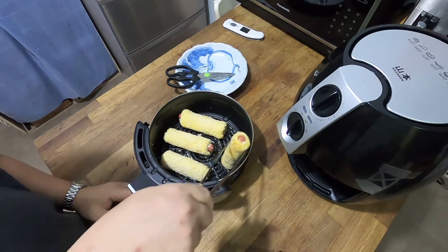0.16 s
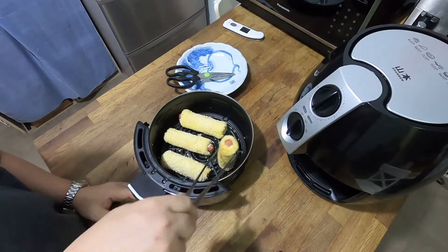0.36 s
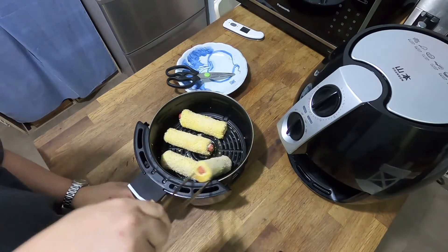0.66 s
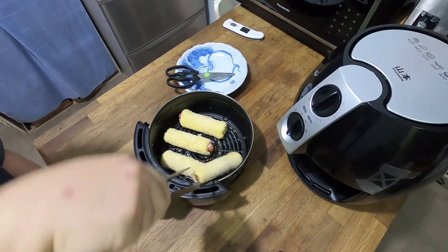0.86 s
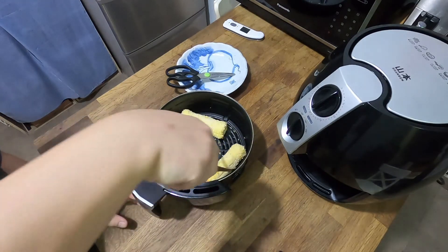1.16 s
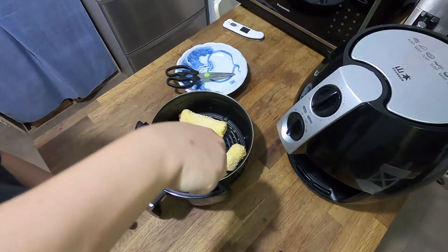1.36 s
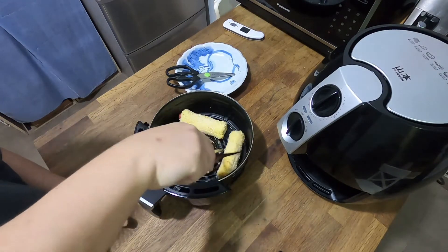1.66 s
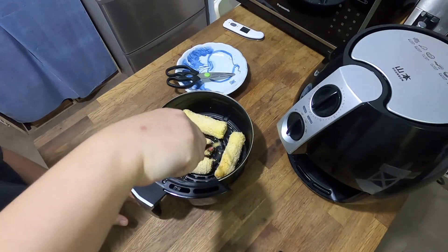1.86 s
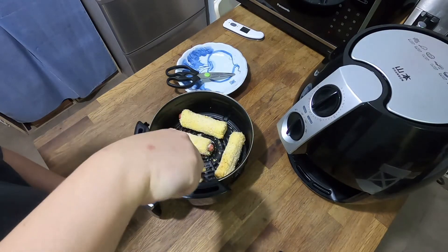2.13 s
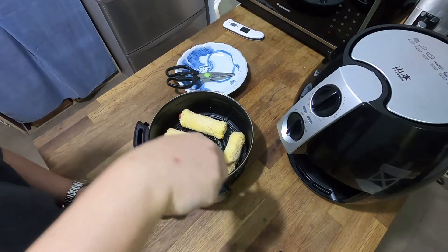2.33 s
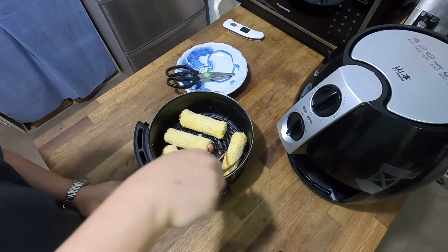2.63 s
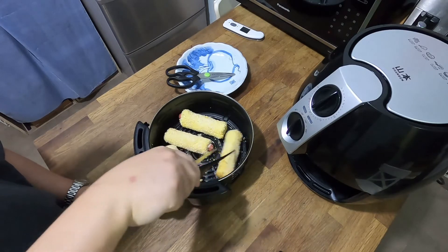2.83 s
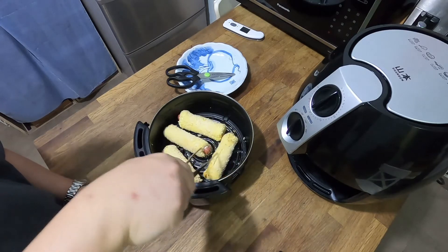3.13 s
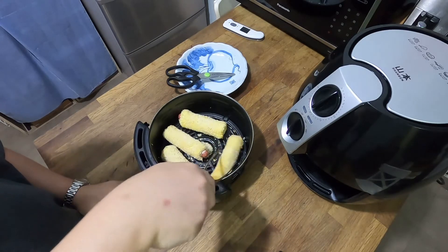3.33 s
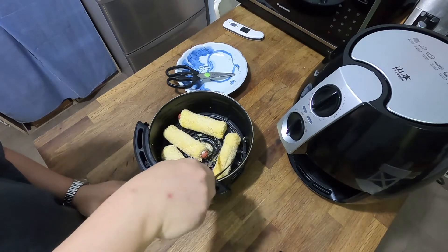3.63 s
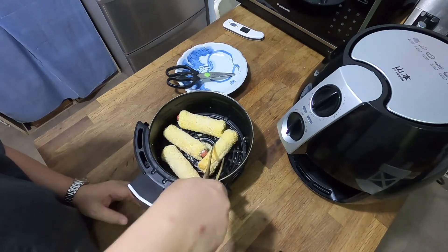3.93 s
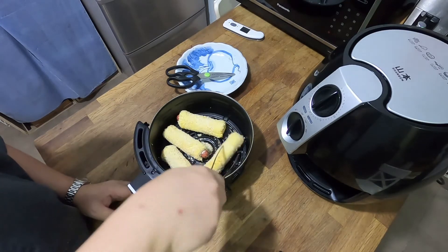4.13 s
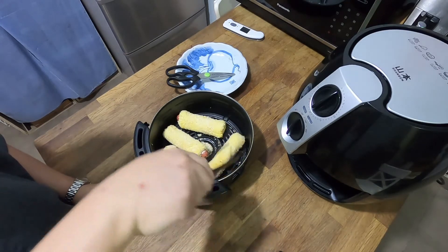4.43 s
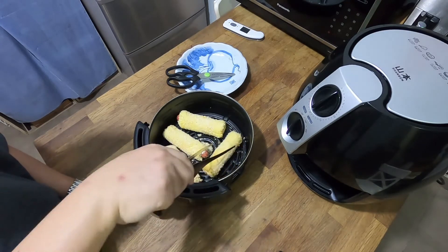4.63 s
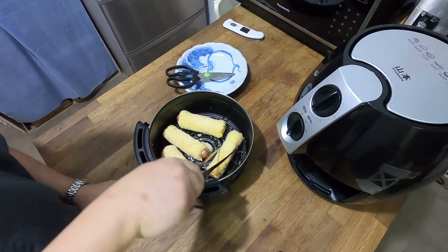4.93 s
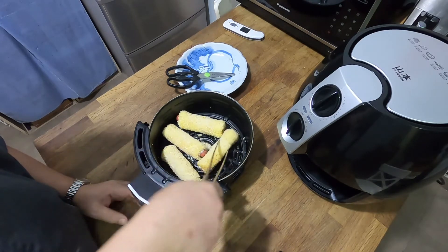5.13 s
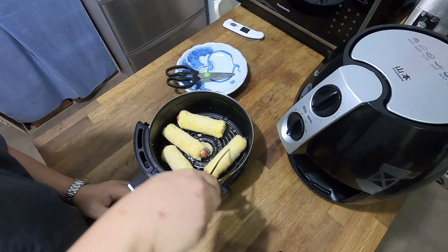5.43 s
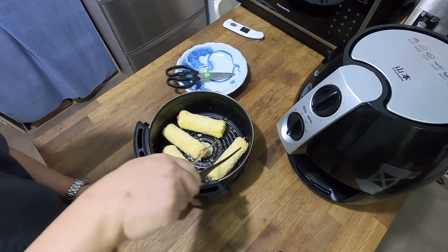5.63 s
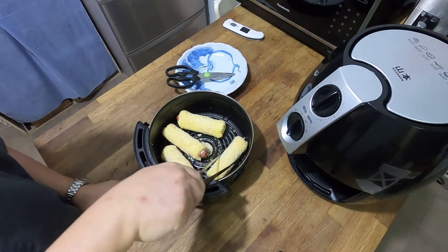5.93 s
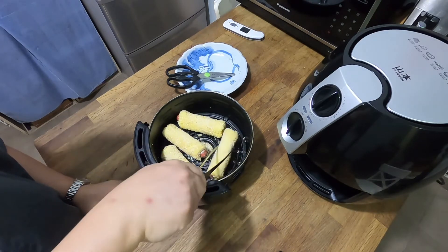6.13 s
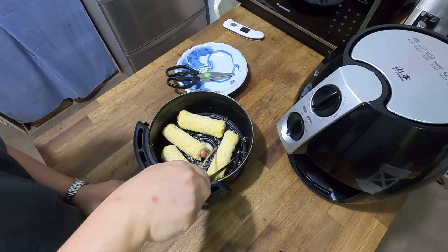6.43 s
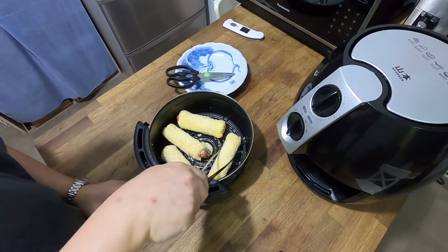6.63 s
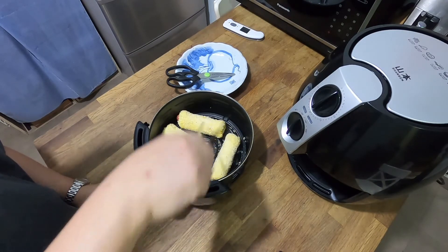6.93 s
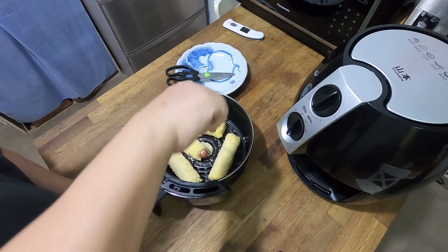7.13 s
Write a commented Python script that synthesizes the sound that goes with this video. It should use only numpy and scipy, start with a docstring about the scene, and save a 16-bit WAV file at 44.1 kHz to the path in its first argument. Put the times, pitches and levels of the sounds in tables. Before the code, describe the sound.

Steel tongs tick, scrape and clang against an air fryer's wire rack as food is turned, over a low appliance drone.

```python
"""Steel tongs turn food in the wire basket of an air fryer on a wooden kitchen counter.
From the start an appliance drones low in the room. A tick comes, then the tips slip and strike the
rack: the wires and tongs ring, and the basket thuds on the wood. Next the tips scrape over wires
and crust. Blows, ticks and scrapes mix for over five seconds; then come only ticks and scrapes,
and at last the drone fades down. Two close microphone ports listen from above."""
import sys
import numpy as np
from scipy import signal
from scipy.fft import rfft, irfft, next_fast_len
from scipy.io import wavfile
from scipy.ndimage import uniform_filter1d, map_coordinates

SR = 44100
rng = np.random.default_rng(int(sys.argv[2]) if len(sys.argv) > 2 else 0)


def log_audio(samples):
    """Write samples as a 16-bit WAV file to the path given in sys.argv[1]."""
    # one column per channel
    frames = np.atleast_2d(samples).T
    # limit to full scale, then quantise
    limited = np.clip(frames, -1, 1)
    pcm = np.round(limited * 32767).astype(np.int16)
    wavfile.write(sys.argv[1], SR, pcm)


N = 320607


def amp(db):
    """Turn decibels into a number to multiply by."""
    return 10 ** (np.asarray(db) / 20)


def unit(x):
    """Scale x to an average power of 1."""
    return x / np.sqrt(np.mean(x ** 2) + 1e-20)


def along(points, hz):
    """Read between (frequency, value) points, with octaves evenly spaced."""
    f, values = np.transpose(points)
    return np.interp(np.log(hz + 1), np.log(f + 1), values)


def wobble(rate):
    """A smooth random curve through `rate` points a second."""
    points = rng.standard_normal(int(N * rate / SR) + 4)
    return map_coordinates(points, [np.arange(N) * rate / SR])


def filtered(x, response):
    """Scale and shift each frequency in x by response(hz)."""
    n = x.shape[-1]
    padded = next_fast_len(n + 8192)
    return irfft(rfft(x, padded) * response(np.fft.rfftfreq(padded, 1 / SR)), padded)[..., :n]


# How alike left and right sound: f/Hz, likeness (1 = the same)
LIKENESS = [(60, .99), (500, .9), (2000, .75), (5000, .45), (12000, .25)]
def stereo(noises):
    """Mix two noises like sound reaching both ports from all around: low notes are most alike."""
    turn = lambda hz: np.arccos(np.clip(along(LIKENESS, hz), -1, 1)) / 2
    mid, side = filtered(noises, lambda hz: np.array([np.cos(turn(hz)), np.sin(turn(hz))]))
    return np.array([mid + side, mid - side])


# The room's own low tones: f/Hz, width/Hz, level/dB
ROOM_TONES = [(60.7, 5.3, -52), (83.67, 8.3, -43.5), (123.1, 5, -55.5), (138, 14, -71), (164.2, 14.7, -54),
              (203, 15, -65)]
# How those tones swell and sink: t/s, level/dB
ROOM_SWELL = [(0, 2.5), (1, -2), (3.5, -1.5), (4.8, 1), (5.4, -3.5), (6.2, 2), (7.27, -10)]
# Faint rush of air: f/Hz, level/dB
AIR_COLOUR = [(12, -54), (20, 3), (109, 0.5), (238, -16), (428, -25.5), (835, -40.5), (1100, -30.5),
              (2770, -41.5), (7130, -44.5), (15600, -86)]
def appliance_drone():
    """A motor's low noise swells in the room's own tones, with a wavering hum and faint air."""
    t, hum_hz = np.arange(N) / SR, 101
    noise = rng.standard_normal((2, N))
    tones = sum(amp(db) * unit(filtered(noise, lambda f: 1 / (1 + (2 * (f - hz) / width) ** 4)))
                for hz, width, db in ROOM_TONES)
    tones *= amp(np.interp(t, *np.transpose(ROOM_SWELL)))
    air_colour = lambda f: amp(along(AIR_COLOUR, f)) / (1 + (130 / (f + 1)) ** 2)
    air = unit(filtered(rng.standard_normal((2, N)), air_colour))
    air *= amp(-49.5 + 1.2 * wobble(3))
    hum = amp(-45 + 3.4 * wobble(6.6)) * np.sin(2 * np.pi * hum_hz * t + 0.32 * wobble(4.3))
    return hum + stereo(tones + air)


# The rough sound shared by ticks and scrapes: f/Hz, level/dB
RASP_COLOUR = [(300, -8.5), (600, -9), (1000, -3), (2000, -5), (3600, -1.5), (7200, -4), (8500, -15),
               (12000, -24), (15600, -32.5)]
# Short ticks and knocks, some a blow's second strike: t/s, level/dB, centre f/Hz
CONTACT_TICKS = [(0.171, -33, 3800), (0.352, -23.5, 2400), (0.363, -34, 4000), (0.77, -17, 1073),
                 (1.134, -25, 3300), (0.574, -22.5, 2000), (1.555, -30, 2640), (1.644, -28, 1050),
                 (1.723, -30, 2940), (1.895, -34, 3260), (2.206, -31.5, 1010), (2.266, -26, 4870),
                 (2.793, -25.5, 1920), (2.965, -22.5, 2630), (3.4195, -8, 1310), (3.66, -29, 2760),
                 (3.689, -25, 2600), (3.82, -25.5, 3760), (3.859, -32.5, 1200), (3.931, -34, 4400),
                 (4.274, -27, 3500), (4.621, -30, 3000), (4.788, -23.5, 3970), (4.808, -30, 4000),
                 (4.911, -27.5, 2780), (4.939, -23, 2720), (4.971, -34, 3500), (5.01, -28, 3000),
                 (5.046, -28, 2840), (5.14, -22, 4580), (5.179, -35, 3000), (5.226, -22.5, 3140),
                 (5.631, -14, 2000), (5.948, -29, 4200), (5.986, -28, 3360), (6.012, -31, 2860),
                 (6.049, -28, 3480), (6.074, -43, 3000), (6.097, -28, 3620), (6.117, -24.5, 4000),
                 (6.145, -27, 3820), (6.259, -28, 1040), (6.269, -28, 3770), (6.281, -26, 950),
                 (6.326, -27.5, 3270)]
def contact_ticks():
    """The tips tick and knock on crust, wires and basket: tiny noise bursts, each at its own pitch."""
    out, t = np.zeros((2, N + SR)), np.arange(1024) / SR
    rise = 1 - np.exp(-t / 0.00087)
    for start, db, centre_hz in CONTACT_TICKS:
        band = lambda f: amp(along(RASP_COLOUR, f)) / np.sqrt(1 + (np.log((f + 1) / centre_hz) / .45)**4)
        burst = unit(filtered(stereo(rng.standard_normal((2, len(t)))), band))
        out[:, round(start * SR):][:, :len(t)] += amp(db - 5.5 - 60 * t / 0.023) * rise * burst
    return out[:, :N]


# How long the kitchen echoes: f/Hz, fade/s (a fade is the time to drop by 60 dB)
ECHO_FADES = [(300, 0.45), (1500, 0.45), (5000, 0.34), (12000, 0.25)]
def kitchen_echo(colour_db, size, length=1):
    """Sound off the walls: noise whose high notes die first. A length below 1 shortens it."""
    hz, t, bands = signal.stft(rng.standard_normal((2, size)), SR, nperseg=256)
    fade = amp(colour_db(hz)[:, None] - 60 * t / (length * along(ECHO_FADES, hz)[:, None]))
    tail = signal.istft(bands * fade, SR, nperseg=256)[1][:, :size]
    return stereo(tail / np.linalg.norm(tail, axis=1, keepdims=True))


def ring(notes, colour_db, t, scatter_db, loose=1, length=1):
    """A struck part rings in fading notes; loose parts rattle, so each note flutters and wanders."""
    hz, db, fade_s = np.transpose(notes)[:, :, None]
    strength, phase = rng.standard_normal((2, len(notes), 1))
    points = rng.standard_normal((2, len(notes), 24))
    flutter, wander = loose * signal.resample(points, len(t), axis=2)
    level = db + colour_db(hz) + scatter_db * strength + 2.2 * flutter
    level -= 60 * t / np.clip(length * fade_s, .03, .7)
    return np.sum(amp(level) * np.sin(2 * np.pi * hz * t + 2 * phase + .9 * wander), axis=0)


# Notes of the wire rack, and of the basket on the wood: f/Hz, level/dB, fade/s
RACK_NOTES = [(754, -10, .35), (940, -2, .15), (1070, -1, .28), (1244, -5, .22), (1345, -8, .25),
              (1533, -7, .3), (1776, -5, .2), (1843, -4, .25), (1976, -5, .23), (2065, -4, .28),
              (2143, -7, .17), (2229, -5, .3), (2892, -8, .3), (3017, -4, .21), (3225, -10, .2),
              (3590, -11, .25), (3875, -9, .35), (4150, -9, .2), (4778, -8, .25), (6465, -14, .25)]
THUD_NOTES = [(170.4, 2, 0.46), (238.2, -2, 0.39), (287.7, -12, 0.62), (364, -4.5, 0.12)]
# The clash of many small, crowded metal notes: f/Hz, level/dB
CLASH_COLOUR = [(400, -8.5), (700, -7.5), (1100, -19), (2000, -8), (3500, -10.5), (6800, -3.5), (8300, -20),
                (12000, -37.5), (15600, -52)]
# Blows: t/s, level/dB, thud/dB, basket wall/dB, brightness/dB, ring/dB, ring length (a factor),
# then where the notes are boosted: wall f/Hz, wire f/Hz, thud f/Hz
BLOWS = [(0.1966, -12.5, -17.5, -6, 2.5, -22, 1.02, 1550, 2370, 363),
         (0.7594, -28, -2.5, 9.5, -3, -14.5, 0.35, 1070, 1900, 215),
         (0.7953, -34, -2, 23, -15, -23, 0.46, 1070, 1780, 231.5),
         (1.2168, -10.5, -24, -3, -3, -21, 0.85, 1480, 2160, 300),
         (1.4, -37.5, -34, -16, -23, -7.5, 1.1, 1530, 2900, 250),
         (2.0724, -23, -35, -10.5, -13.5, -15.5, 0.5, 1080, 2260, 202),
         (2.4693, -5.5, -13.5, -5.5, -3.5, -22.5, 1.2, 1010, 2995, 240),
         (2.7282, -24, -22, -28, -3, -47, 0.74, 1420, 2880, 200),
         (3.2085, -26, -10, -5.5, -8, -14, 0.33, 945, 2360, 237),
         (3.4097, -6.5, -11, -4, -3.5, -20.5, 1.4, 1200, 2100, 355),
         (4.043, -35, 4.5, 10, -11, -32, 0.65, 1010, 1780, 300),
         (4.4048, -6, -16, -5.5, -5, -20, 1.12, 920, 1830, 250),
         (5.3384, -10.5, -11.5, -3, -7.5, -19, 1.22, 754, 1800, 370),
         (5.4868, -25.5, -13.5, 2.5, -38, -20, 2.6, 1070, 2120, 237),
         (5.6099, -24.5, -36, 3.5, 0, -15, 0.81, 1040, 3050, 323)]
def rack_blows():
    """Each blow rings the rack, most in the parts it touches, clashes, and thuds the counter."""
    out, t = np.zeros((2, N + SR)), np.arange(16384) / SR
    bump = lambda hz, centre_hz, width: np.exp(-(np.log(hz / centre_hz) / width) ** 2)
    metal_rise, thud_rise = 1 - np.exp(-t / 0.00087), 1 - np.exp(-t / 0.0076)
    for start, db, thud_db, wall_db, bright_db, ring_db, length, wall_hz, wire_hz, thud_hz in BLOWS:
        colour = lambda hz: along([(1100, wall_db), (1600, 0), (3500, 0.017), (5500, bright_db)], hz)
        touched = lambda hz: colour(hz) + 8 * bump(hz, wall_hz, .08) + 5 * bump(hz, wire_hz, .05)
        rack = amp(ring_db) * ring(RACK_NOTES, touched, t, scatter_db=2.5, length=length)
        clash_colour = lambda hz: along(CLASH_COLOUR, hz) + colour(hz)
        clash = amp(12) * kitchen_echo(clash_colour, len(t), length=0.16)
        echo = amp(14.5) * kitchen_echo(clash_colour, len(t))
        thud_colour = lambda hz: 9 * bump(hz, thud_hz, 0.15)
        thud = amp(thud_db - 12.5) * ring(THUD_NOTES, thud_colour, t, scatter_db=3.5)
        blow = (rack + clash + echo) * metal_rise + thud * thud_rise
        out[:, round(start * SR):][:, :len(t)] += amp(db) * blow
    return out[:, :N]


# Notes of the steel tongs: f/Hz, level/dB, fade/s
TONG_NOTES = [(2930, -2, .45), (3871, 0, .55), (4786, 0, .6), (6170, -5, .25)]
# Blows that leave the tongs free to ring: t/s, level/dB, ring length (a factor)
TONG_CLINKS = [(0.1965, -35, .85), (1.2163, -33, .35)]
def tong_clinks():
    """The loosely held tongs ring on after a blow, with little flutter."""
    out, t = np.zeros(N + SR), np.arange(16384) / SR
    for start, db, length in TONG_CLINKS:
        clink = ring(TONG_NOTES, np.zeros_like, t, scatter_db=1.5, loose=.4, length=length)
        out[round(start * SR):][:len(t)] += amp(db) * clink
    return out[:N]


def tip_catches(count, cycles):
    """The tips catch at random moments: each catch is a note that dies within a few cycles."""
    when, pitch, size = rng.random((count, 3)).T[:, :, None]
    age, hz = np.arange(160), 700 * 18 ** pitch
    fade = amp(14 * size - 60 * age * hz / (SR * cycles))
    clicks = fade * np.sin(2 * np.pi * hz * age / SR) * np.sqrt(hz)
    return np.bincount((when * N + age).astype(int).ravel(), clicks.ravel(), minlength=N)[:N]


def rack_response(f):
    """The scraped rack gives a broad rasp and shakes most near its own notes."""
    wires = 0
    for hz, db, fade_s in RACK_NOTES:
        width_hz = 3 * np.log(1000) / (np.pi * fade_s)
        wires += amp(db) * 1j * f * width_hz / (hz * hz - f * f + 1j * f * width_hz)
    return amp(along(RASP_COLOUR, f)) * (1 + .8 * wires)


def shifting_contact(x, depth_db):
    """The contact keeps changing: short patches of x stand out, each at its own pitch."""
    bands = signal.stft(x, nperseg=256)[2]
    patches = uniform_filter1d(rng.standard_normal(bands.shape[1:]), size=4, axis=0)
    patches = uniform_filter1d(patches, size=5, axis=1)
    return signal.istft(bands * amp(depth_db * unit(patches)), nperseg=256)[1][:, :N]


# Strokes over rack and crust: t/s, held/s, level/dB, share reaching the basket wall/dB
SCRAPES = [(.4, 0.38, -53, -13), (.58, 0.29, -49.5, -3.5), (.82, 0.068, -54, 4.5), (0.912, 0.14, -41, 4.5),
           (1.01, 0.041, -34.5, -20), (1.124, 0.015, -33.5, -5), (1.38, 0.023, -44, -12),
           (1.47, 0.032, -48.5, -14), (1.584, 0.085, -36.5, -10), (1.72, 0.061, -55, -13),
           (1.82, 0.14, -55, -9), (2.121, 0.23, -46.5, -2.5), (2.736, 0.042, -37.5, -17),
           (2.861, 0.22, -45, -7), (3.098, 0.13, -41.5, -6), (3.33, 0.035, -42.5, -15),
           (3.658, 0.09, -49.5, -5), (3.823, 0.16, -43, -4), (4.02, 0.37, -50.5, -17),
           (4.28, 0.062, -53.5, -6), (4.802, 0.025, -44.5, -7.5), (4.92, 0.057, -42.5, -12.5),
           (5.04, 0.039, -38.5, -15), (5.12, 0.17, -46, -4.5), (5.502, 0.11, -50.5, 6),
           (5.628, 0.015, -38.5, -6), (5.7, 0.11, -70, -2), (5.96, 0.11, -54.5, 0.5),
           (6.058, 0.088, -43, -9), (6.271, 0.044, -45.5, -8), (6.609, 0.19, -52.5, -1.5)]
def scrapes():
    """Dragging tips shake the rack and basket wall; each blow also leaves a short rattle."""
    t, tip_gain, wall_gain = np.arange(N) / SR, np.zeros(N), np.zeros(N)
    rise_db_per_s, fall_db_per_s, rattle_db_per_s = 456, 285, 119
    for start, held, db, wall_db in SCRAPES:
        before, after = np.clip(start - t, 0, 1), np.clip(t - start - held, 0, 1)
        stroke = amp(db - rise_db_per_s * before - fall_db_per_s * after)
        tip_gain += stroke
        wall_gain += stroke * amp(wall_db)
    for start, db, *_ in BLOWS:
        after = np.clip(t - start - 0.1, 0, 1)  # the rattle holds for 0.1 s, then fades
        rattle = (t > start) * amp(db - 33.5 - rattle_db_per_s * after)
        tip_gain += rattle
        wall_gain += rattle * amp(-3.5)
    catches = unit(np.array([tip_catches(count=6000, cycles=c) for c in (2.21, 3.2)]))
    grit = .9 * rng.standard_normal((2, N))
    clumps = amp(1.2 * wobble(35) + 2.5 * wobble(130))
    rubbing = stereo(unit(catches + grit)) * clumps
    low = lambda f: 1 / (1 + (f / 1400) ** 8)  # the wall gives the lows, the tips the highs
    tips = filtered(rubbing * tip_gain, lambda f: rack_response(f) * (1 - low(f)))
    wall = filtered(rubbing * wall_gain, lambda f: rack_response(f) * low(f))
    return amp(0.5) * shifting_contact(tips + amp(3) * wall, depth_db=3.5)


def scene():
    """Add up all the sounds; the kitchen's echo smears the ticks and scrapes."""
    close = contact_ticks() + scrapes()
    echo = signal.fftconvolve(close[:1], kitchen_echo(np.zeros_like, SR // 2), axes=1)[:, :N]
    return appliance_drone() + rack_blows() + tong_clinks() + close + amp(-3.5) * echo


# How much louder the left port is than the right: f/Hz, level/dB
LEFT_LOUDER = [(60, 0), (180, 1), (550, 0.5), (1650, 1.5), (4970, 1), (15000, -7.5)]
# How far the left port's wave is ahead: f/Hz, phase/rad
LEFT_AHEAD = [(100, 0), (1000, -.28), (3000, -.8), (4700, -1.1), (7200, -2.3), (8200, -.9), (10000, -1.4),
              (13000, -2.5)]
def record(dry):
    """The two ports differ a little in tone and timing, and pick up nothing above top_hz."""
    side, top_hz = np.array([[.5], [-.5]]), 15720
    ports = lambda hz: amp(side * along(LEFT_LOUDER, hz)) * np.exp(1j * side * along(LEFT_AHEAD, hz))
    return filtered(dry, lambda hz: ports(hz) * (hz < top_hz))


dry = scene()
out = record(dry)
log_audio(out)
```